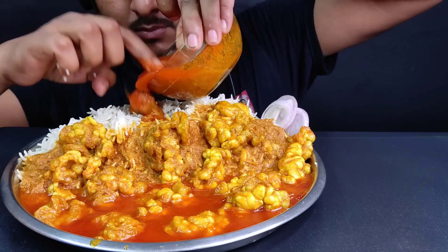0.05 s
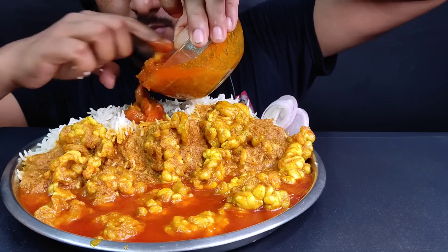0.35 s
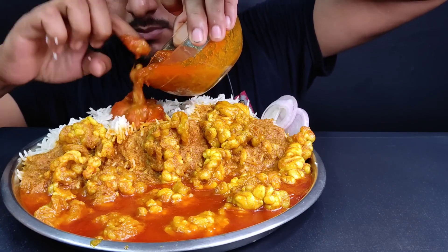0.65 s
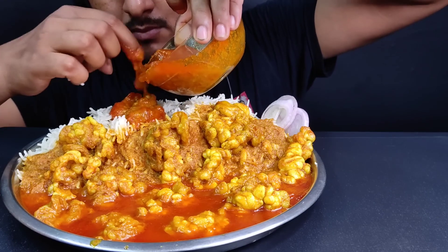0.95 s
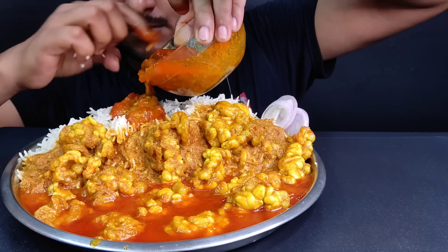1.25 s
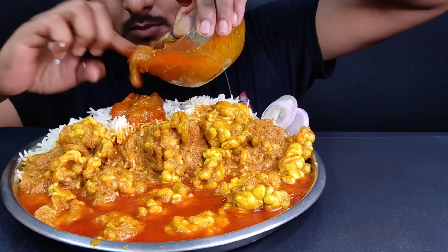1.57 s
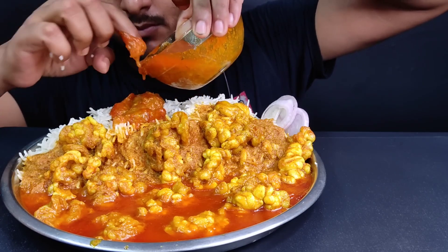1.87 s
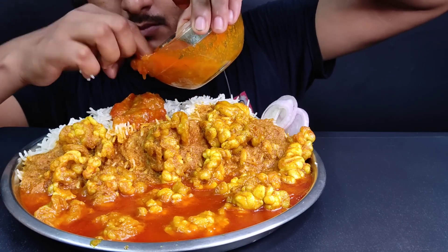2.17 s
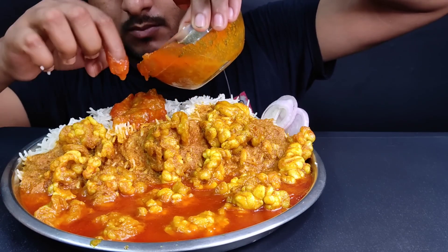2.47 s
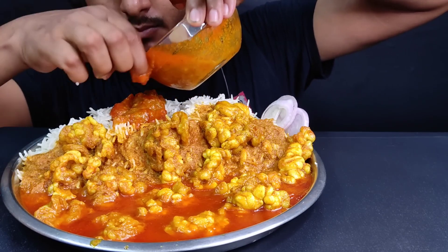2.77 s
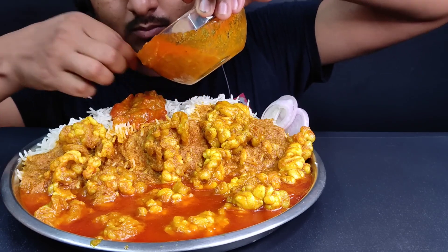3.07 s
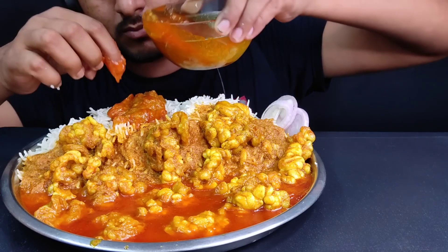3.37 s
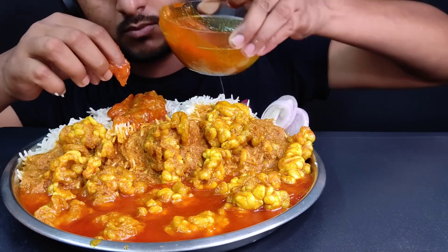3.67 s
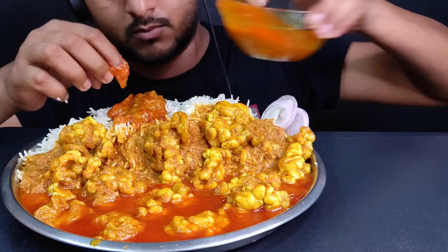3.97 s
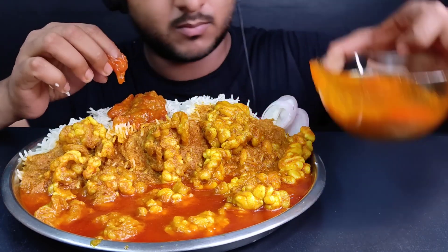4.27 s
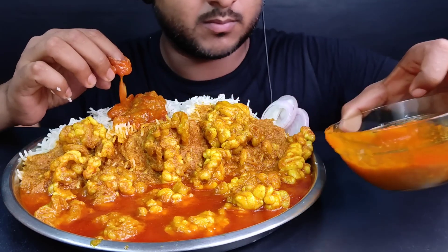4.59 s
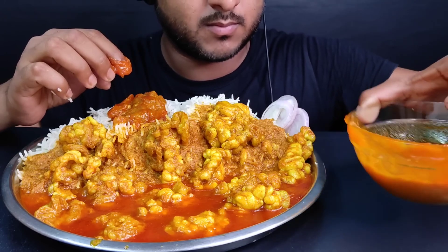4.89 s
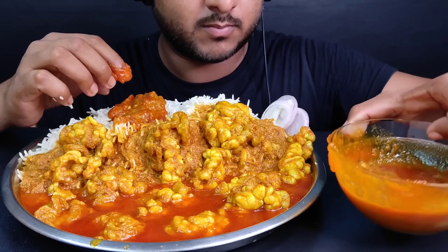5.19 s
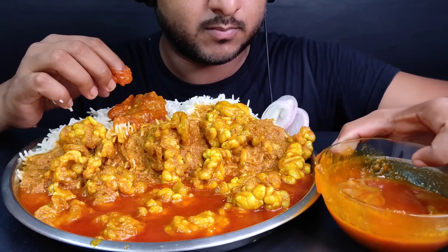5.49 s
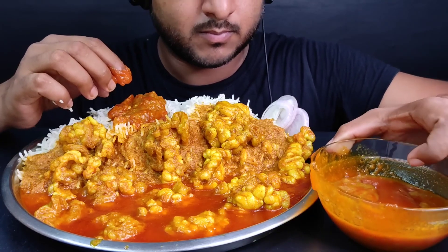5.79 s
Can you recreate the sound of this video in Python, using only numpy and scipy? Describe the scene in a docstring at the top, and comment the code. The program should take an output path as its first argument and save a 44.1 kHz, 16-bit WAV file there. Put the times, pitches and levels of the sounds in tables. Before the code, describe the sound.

In a quiet room with a far engine humming, gravy ticks softly before a glass bowl lands with a loud double knock.

```python
"""Gravy bowl in a quiet room

Thick gravy slides from a glass bowl with a few tiny wet ticks. An engine drones far outside,
air rushes steadily and faint chirps drift in. Everything drops out for an instant and the
background returns lower. Then the bowl lands with a loud knock that rings the table, and rocks once."""
import sys
import numpy as np
from scipy import signal
from scipy.fft import rfft, irfft, next_fast_len
from scipy.io import wavfile
from scipy.ndimage import uniform_filter1d, map_coordinates

SR = 44100
rng = np.random.default_rng(int(sys.argv[2]) if len(sys.argv) > 2 else 0)


def to_wav(sig):
    """Store sig (one row per channel, or 1-D mono) as 16-bit WAV at the path in sys.argv[1].

    Samples outside -1..1 are clipped; the rate is SR.
    """
    pcm = np.clip(np.atleast_2d(sig), -1, 1) * 32767
    pcm = np.round(pcm).astype(np.int16)
    wavfile.write(sys.argv[1], SR, pcm.T)  # frames by channels


N = 257544

# The instant of silence: start and end in seconds.
DROPOUT_S = (5.119, 5.186)
OUTSIDE_STEP_DB = -9.5  # engine and hums come back this much lower


def bowl(clatter_db=-22, build_s=.0032, thump_db=-15, thump_hz=118, thump_rise_s=.0074,
         crack_db=-25, crack_hz=3500, clink_db=-23, clink_hz=3950):
    """Each contact shoves the table top; bending waves spread, ring its modes and fill the room."""
    # Each row: start in seconds, gain in dB, push speed in Hz (higher is snappier),
    # low-pass in Hz, table trim in dB, clatter trim in dB.
    contacts = [(5.5977, -1, 600, 9000, 1, 2), (5.8107, -11, 1040, 2320, -2, 3.5),
                (5.836, -34.5, 4500, 6000, -15, -8)]
    # Modes of table and bowl. Each row: pitch in Hz, relative level in dB, T60 in seconds.
    modes = [(99, -22, 0.27), (125, -18, 0.28), (195, -32, 1.57), (271, -19, 0.69), (301, -15, 0.23),
             (332, -14, 0.16), (379, -15, 0.27), (412, -19, 0.27), (472, -12, 0.23), (509, -32, 1.04),
             (546, -25, 0.26), (611, -25, 0.39), (636, -17, 0.47), (679, -28, 0.44), (720, -22, 0.18),
             (800, -23, 0.16), (929, -26, 0.2), (1025, -26, 0.28), (1108, -32, 0.26), (1173, -26, 0.14),
             (1226, -33, 0.33), (1364, -25, 0.17), (1836, -31, 0.12), (2226, -30, 0.1), (2957, -42, 0.16),
             (4149, -45, 0.15)]
    out, t = np.zeros(N + SR), np.arange(SR // 2) / SR
    for start, db, push_hz, dull_hz, table_db, tail_db in contacts:
        u = np.pi * (push_hz * t - 2 / 3) * np.sqrt(2)
        push = u * np.exp((1 - u * u) / 2)  # the top dips and springs back
        give = (t / thump_rise_s) ** 2 * np.exp(2 - 2 * t / thump_rise_s)  # the whole table yields
        thump = amp(thump_db) * give * np.sin(2 * np.pi * thump_hz * t)
        ring = sum(amp(level + rng.normal(0, 1) - 60 * t / t60)
                   * np.sin(2 * np.pi * (hz * t + rng.random())) for hz, level, t60 in modes)
        tail = amp(clatter_db + tail_db) * clatter(len(t))
        spread = 1 - np.exp(-t / build_s)
        blow = push + spread * (amp(table_db) * (thump + ring) + tail)
        # Glass hits the hard top; hand and gravy damp it at once.
        burst = signal.lfilter(*signal.butter(2, crack_hz, fs=SR), rng.standard_normal(len(t)))
        clink = amp(clink_db) * np.sin(2 * np.pi * clink_hz * t)
        glass = amp(-60 * t / .014) * (amp(crack_db) * burst + clink)
        knock = signal.lfilter(*signal.butter(2, dull_hz, fs=SR), blow + glass)
        out[round(start * SR):][:len(t)] += amp(db) * knock
    return out[:N]


def clatter(samples):
    """The dense ring of table and room after a blow; the treble dies first."""
    # Each row: frequency in Hz, relative level in dB.
    colour = [(40, -18), (110, -5), (200, -9.5), (330, 0.5), (600, -7.5), (900, -7.5), (1300, -2),
              (2200, -11), (3200, -16.5), (4500, -22.5), (6500, -28), (10000, -45), (14000, -47)]
    # Each row: frequency in Hz, T60 in seconds.
    room_decay = [(100, 0.38), (500, 0.94), (1400, 0.24), (3800, 0.16), (10000, 0.16)]
    wash = coloured_noise(colour)[SR:SR + samples]
    hz, t, bands = signal.stft(wash, SR, nperseg=512)
    decay = amp(-60 * t / along(room_decay, hz)[:, None])
    return signal.istft(bands * decay, SR, nperseg=512)[1][:samples]


def gravy(width_hz=5000):
    """Films of gravy part with a tiny high snap."""
    # Each row: start in seconds, level in dB, T60 in seconds, band centre in Hz.
    ticks = [(.052, -64.5, .02, 8500), (0.174, -62.5, 0.018, 10500), (.507, -69, .03, 7000),
             (.893, -68.5, 0.075, 10000), (4.95, -71, .15, 12800)]
    t, out = np.arange(N) / SR, np.zeros(N)
    for start, db, t60, hz in ticks:
        snap = (t >= start) * amp(db - 60 * abs(t - start) / t60)
        out += snap * noise(lambda f: resonance(f, hz, width_hz))
    return out


def engine(firing_hz=105.75, sag_hz=2.1, sag_at_s=2.4, sag_s=.4, waver_db=1.5, drift_rad=.36):
    """A far engine eases off and its pitch sags; walls pass only its low lines, which beat together."""
    # Fader ride of the firing tone. Each row: time in seconds, relative level in dB.
    ride = [(0, -34), (.1, -26), (.5, -28), (.58, -36), (.75, -30), (1, -23), (1.5, -31), (2.02, -35.5),
            (2.15, -47), (2.73, -35), (3.02, -47), (3.7, -41.5), (4.3, -43.5), (5.1, -35)]
    # The weaker lines. Each row: multiple of the engine cycle, relative level in dB.
    orders = [(2, 0), (3, -6), (5, -13), (7, -2), (8, -13), (15, -19), (18, -20), (19, -19), (31, -30)]
    t = np.arange(N) / SR
    pitch = firing_hz - sag_hz * (1 + np.tanh((t - sag_at_s) / sag_s)) / 2
    cycle = 2 * np.pi * np.cumsum(pitch) / SR / 6  # six firings a cycle
    throb = sum(amp(db + waver_db * wobble(11))
                * np.sin(order * cycle + rng.uniform(0, 2 * np.pi) + drift_rad * wobble(6.8))
                for order, db in orders)
    throb *= amp(np.maximum(-36 - 6.5 * t, -49.5))  # fades, then holds
    firing = amp(automation(ride) - 1 + .73 * wobble(12)) * np.sin(6 * cycle)
    return np.sqrt(2) * step_down(OUTSIDE_STEP_DB) * (firing + throb)


def hums(waver_db=1.6):
    """Low tones from outside swell and fade, each wavering a little."""
    # Each row: peak time in seconds, fade each way in seconds, pitch in Hz, relative level in dB.
    tones = [(0.098, 0.26, 33.4, -32), (0.995, 0.85, 263.5, -57.5), (1.25, .3, 542.4, -60),
             (2.025, 0.15, 35, -31), (2.313, 0.33, 196.3, -47), (3.602, 2.2, 377.3, -56),
             (3.703, 0.27, 139.5, -49.5), (4.953, 0.67, 113.8, -38.5)]
    t, out = np.arange(N) / SR, np.zeros(N)
    for peak, fade, hz, db in tones:
        level = amp(db + waver_db * wobble(4.8)) * swell(peak, fade)
        phase = 2 * np.pi * (hz * t + rng.random()) + hz / 500 * wobble(12)
        out += level * np.sqrt(2) * np.sin(phase)
    return step_down(OUTSIDE_STEP_DB) * out


def air(rumble_db=-37.5, rush_db=-53.5, hiss_db=-71.5):
    """The background level rises slowly, lifting rumble, rush and hiss together."""
    # Each row: time in seconds, relative level in dB.
    ride = [(0, -3), (.6, -1.4), (1.1, -2), (2.6, -0.74), (3.3, -0.3), (3.7, 0.6), (4.2, -0.15),
            (5.1, -0.16)]
    # Low room resonances. Each row: centre in Hz, nominal width in Hz, relative level in dB.
    room_modes = [(32.8, 7.6, -1.5), (52.3, 14, -8), (104.2, 11.4, -6.5), (136, 4.7, -11), (197, 4.8, -6.5),
                  (341.5, 9.8, -16), (372.7, 5.7, -21)]
    # EQ of each layer. Each row: frequency in Hz, relative level in dB.
    rumble_eq = [(10, -33), (22, -7.5), (60, -11.5), (160, -16), (240, -25), (380, -28.5), (480, -37),
                 (900, -86.5)]
    rush_eq = [(250, -37), (430, 1), (600, 1), (690, -2.5), (770, 5), (830, -2.5), (900, 1.5), (1100, -6.5),
               (1500, -8.5), (2000, -10), (2500, -8.5), (3500, -15), (5000, -23), (9000, -53)]
    hiss_eq = [(2500, -27.5), (5000, 2), (7000, 0), (10000, -3), (12000, -4.5), (14300, -12.5)]

    def boom(f):
        """Narrow resonances stand on a broad, falling rumble."""
        peaks = sum(abs(amp(db) * resonance(f, hz, 1.16 * width)) ** 2 for hz, width, db in room_modes)
        return np.sqrt(amp(along(rumble_eq, f)) ** 2 + peaks)

    background_level = automation(ride)
    rumble = amp(1.02 * background_level + rumble_db) * noise(boom)
    rush = amp(background_level + rush_db + .24 * wobble(14)) * patchy(coloured_noise(rush_eq))
    hiss = amp(1.3 * background_level + hiss_db + .3 * wobble(9.9)) * patchy(coloured_noise(hiss_eq))
    return step_down(-3) * rumble + step_down(-6) * rush + step_down(-3) * hiss


def chirps():
    """Faint chirps and whines: narrow bands of noise that swell and fade."""
    # Each row: peak time in seconds, fade each way in seconds, pitch in Hz,
    # nominal width in Hz, level in dB.
    bands = [(0.407, 0.069, 1960, 120, -65), (0.566, 0.16, 1910, 170, -61.5), (.66, 0.21, 1260, 696, -63),
             (1.324, 0.062, 3430, 170, -65.5), (1.52, .15, 3180, 800, -64), (1.806, 0.13, 3460, 400, -68.5),
             (1.99, 0.1, 2870, 400, -65), (2.29, .13, 3600, 500, -69.5), (2.354, 1, 901, 69, -60)]
    return sum(amp(db) * swell(peak, fade) * noise(lambda f: resonance(f, hz, width))
               for peak, fade, hz, width, db in bands)


def amp(db):
    """Decibels to gain."""
    return 10 ** (np.asarray(db) / 20)


def unit(x):
    """Scale to rms 1."""
    return x / np.sqrt(np.mean(x ** 2) + 1e-20)


def along(points, hz):
    """Read (Hz, value) points on a log frequency axis."""
    f, values = np.transpose(points)
    return np.interp(np.log(hz + 1), np.log(f + 1), values)


def automation(points):
    """Join (seconds, value) points, one value per sample."""
    return np.interp(np.arange(N) / SR, *np.transpose(points))


def swell(peak_s, fade_s):
    """A bell-shaped fade in and out."""
    return np.exp(-2 * ((np.arange(N) / SR - peak_s) / fade_s) ** 2)


def step_down(db):
    """A gain that steps from 1 to db at the dropout."""
    return amp(db * (np.arange(N) / SR > DROPOUT_S[0]))


def wobble(rate):
    """A smooth random curve, rate knots a second."""
    return map_coordinates(rng.standard_normal(int(N * rate / SR) + 4), [np.arange(N) * rate / SR])


def noise(response):
    """Noise of rms 1 with the given frequency response."""
    size = next_fast_len(N + SR // 2)
    spectrum = rfft(rng.standard_normal(N), size) * response(np.fft.rfftfreq(size, 1 / SR))
    return unit(irfft(spectrum, size)[:N])


def coloured_noise(eq):
    """Noise of rms 1 shaped by (Hz, dB) points."""
    return noise(lambda f: amp(along(eq, f)))


def resonance(f, hz, width):
    """Two like damped resonators in series."""
    return (1j * f * width / (hz * hz - f * f + 1j * f * width)) ** 2


def patchy(x, depth_db=1.1):
    """Small patches of time and frequency swell and sink; rms 1."""
    bands = signal.stft(x, nperseg=512)[2]
    patches = uniform_filter1d(rng.standard_normal(bands.shape), size=5, axis=0)
    patches = uniform_filter1d(patches, size=14, axis=1)
    return unit(signal.istft(bands * amp(depth_db * unit(patches)), nperseg=512)[1][:N])


def scene():
    """All sources in one close mono mix."""
    return (engine() + hums() + air() + chirps() + gravy() + bowl())[None]


def record(dry, ceiling=.92, return_s=.012, top_hz=14350):
    """Round off the loudest peaks, mute for an instant and cut the top end steeply."""
    t = np.arange(N) / SR
    rounded = dry / (1 + abs(dry / ceiling) ** 6) ** (1 / 6)
    gate = (t < DROPOUT_S[0]) + np.clip((t - DROPOUT_S[1]) / return_s, 0, 1)
    high_cut = signal.ellip(12, .1, 90, top_hz, fs=SR, output="sos")
    return signal.sosfilt(high_cut, rounded * uniform_filter1d(gate, size=48))


dry = scene()
out = record(dry)
to_wav(out)
```